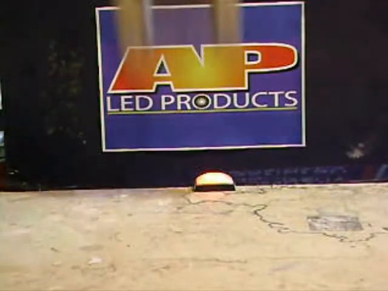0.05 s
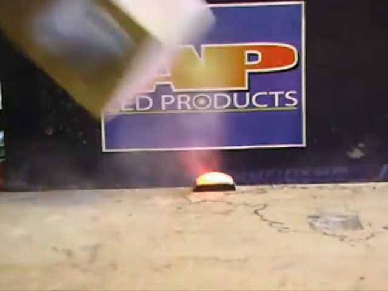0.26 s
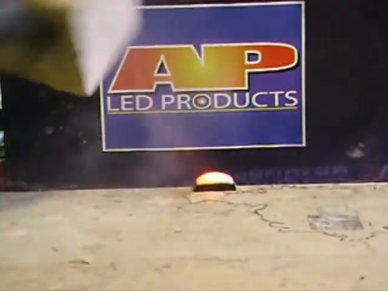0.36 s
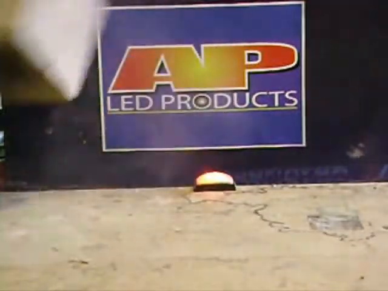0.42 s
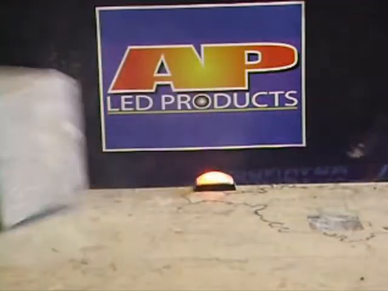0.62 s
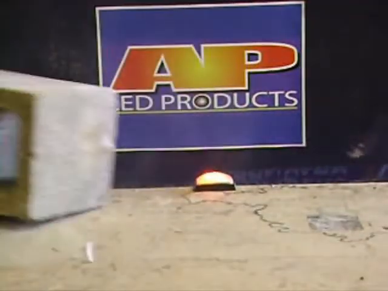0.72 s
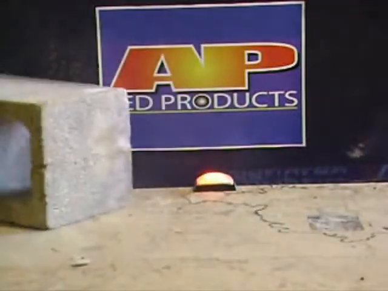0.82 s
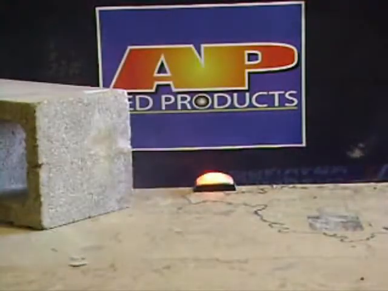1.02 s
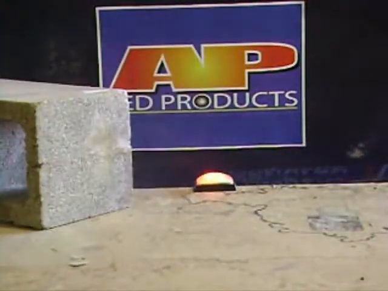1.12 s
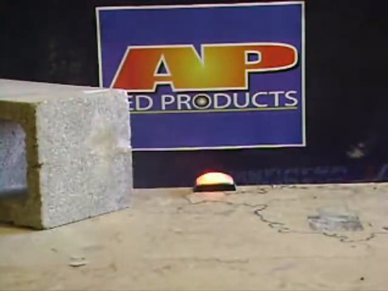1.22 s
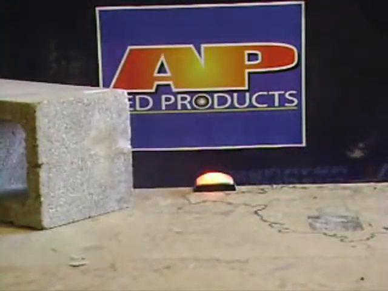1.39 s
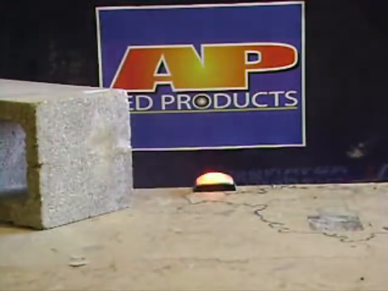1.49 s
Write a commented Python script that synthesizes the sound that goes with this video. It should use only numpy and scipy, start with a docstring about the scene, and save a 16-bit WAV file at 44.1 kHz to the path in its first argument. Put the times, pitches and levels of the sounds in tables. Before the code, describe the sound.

A hollow concrete block crashes onto a small lamp on a concrete floor, tumbles, lands heavily again and rattles to rest as chips scatter. A faint bump follows. Outdoors, nearby walls echo briefly and the microphone distorts heavily.

```python
"""A hollow concrete block crashes onto a small lamp set in a concrete floor, tumbles, lands again and
rattles to rest. Each blow: a snap, a gritty crack, the block's ring, a thud, the floor's knock and boom.
Chips scatter; nearby walls answer. A light tap comes first, a short hollow bump last, over outdoor air.
The small recorder overloads heavily and slowly turns its gain down."""
import sys
import numpy as np
from scipy import signal
from scipy.fft import rfft, irfft
from scipy.io import wavfile
from scipy.ndimage import uniform_filter1d

SR = 44100
rng = np.random.default_rng(int(sys.argv[2]) if len(sys.argv) > 2 else 0)


def int16_out(signal):
    """Quantize to a 16-bit WAV file."""
    q = np.round(np.clip(np.atleast_2d(signal).T, -1, 1) * 32767)
    wavfile.write(sys.argv[1], SR, q.astype(np.int16))


N = 68355
TIME_S = np.arange(N) / SR

# outdoor air spectrum (frequency [Hz], density [dB])
AIR_SPECTRUM = [(25, -13.5), (90, 5), (200, -2.5), (600, -0.5), (1100, -9), (1800, -19), (5200, -21.5)]
# outdoor air envelope (time [s], level [dB])
AIR_ENVELOPE = [(0, -48), (.2, -51), (1.2, -47), (1.55, -56)]

# wall echo spectrum (frequency [Hz], density [dB])
WALL_SPECTRUM = [(40, -10), (130, -6.5), (330, -1), (600, -4.5), (1050, -4), (2100, -2), (3200, -1.5),
                 (5000, -4)]
WALL_DB, WALL_RISE_S, WALL_LOW_T60_S, WALL_HIGH_T60_S, WALL_SPLIT_HZ = -19, 0.022, 0.59, 0.68, 1500

# tap modes (frequency [Hz], relative level [dB], t60 [s])
TAP_MODES = [(340, -3, 0.016), (520, 5.5, 0.013), (1064, -7.5, 0.046), (2470, -18.5, 0.047)]
TAP_S, TAP_DB, TAP_LOW_CUT_HZ = 0.0553, -34.5, 150

# bump tones (frequency [Hz], relative level [dB])
BUMP_TONES = [(305, 3.5), (585, 0.5), (755, 1.5)]
# bump scuff spectrum (frequency [Hz], density [dB])
SCUFF_SPECTRUM = [(100, -46), (200, -24), (250, 8), (400, -2.5), (800, -2), (950, -25), (1600, -27),
                  (5000, -29)]
BUMP_S, BUMP_RISE_S, BUMP_HOLD_S, BUMP_T60_S = 1.442, 0.009, 0.017, 0.078
BUMP_TONE_DB, SCUFF_DB = -38, -32.5

# chip scatter envelope (time [s], level [dB])
CHIP_ENVELOPE = [(.22, -21), (0.548, -20.5), (0.661, -29.5), (.75, -12), (1.05, -24.5), (1.15, -48),
                 (1.25, -55), (1.5, -61.5)]
CHIPS_PER_S, CHIP_T60_CYCLES, CHIP_SPREAD_DB = 500, 19.4, 1.5

# block impacts, relative levels (time [s], snap [dB], crack [dB], thud [dB], boom [dB])
BLOWS = [(.2143, 14, 2.5, 0, -4), (.232, -4, -14, 4, 4.5), (.2487, -10, -1, -4.5, -9),
         (.2772, 6.5, 3.5, -0.5, -7), (0.2984, 6, 1.5, -16, -4.5), (.329, -11, -5.5, -2.5, -23),
         (.347, -6, -3, -27, -24), (.372, -2.5, -6, -12, -20), (.3894, -0.5, 0.5, -21, -19),
         (.4069, -10, -10, -14, -23), (.436, -20, -11.5, -17, -19), (.4508, -8.5, -5.5, -10, -31),
         (.473, -11, -12, -31, -28), (.4957, 8.5, 3, -12.5, -24), (.519, -8.5, -12.5, -8, -14.5),
         (.556, -17, -16.5, -19.5, -22), (0.574, -11, -11.5, -22, -38), (0.6186, -3.5, -11, -25, -19),
         (0.686, -11, -18, 3, 5), (.7037, 2.5, 4.5, 0, 6.5), (.7291, 3.5, -5.5, -2, -28),
         (.7581, 6, 3, -1.5, -12), (.7845, 1.5, 1, -7, -4.5), (.8074, -6, -2.5, -5, -20),
         (.8304, -9, -5, -5.5, -28), (.846, -7.5, -16, -14.5, -34), (.8658, -19, -12, -25, -25),
         (0.894, -21, -19, -17.5, -19), (.9067, -19, -12, -15.5, -21.5), (0.926, -12, -11, -26, -22),
         (.9401, 7.5, 3.5, 1.5, -10), (.965, -20, -11, -2, -11.5), (.988, -20, -7, -18, -12),
         (1.015, -19, -11.5, -30, -20), (1.04, -11.5, -14, -29, -15.5),
         (1.0743, -17.5, -18.5, -27.5, -21.5), (1.112, -30, -28.5, -28.5, -41), (1.148, -33, -30, -32, -32),
         (1.185, -36, -35.5, -35, -43)]
# first-contact snap spectrum (frequency [Hz], density [dB])
SNAP_SPECTRUM = [(300, -11.5), (1000, -4), (2000, 6), (3500, -4.5), (5200, -3.5)]
# crack spectrum (frequency [Hz], density [dB])
CRACK_SPECTRUM = [(100, -21.5), (250, -6.5), (450, 0), (750, 3), (1120, 6), (1450, -4.5), (2200, -9),
                  (3300, -17), (5200, -12)]
# thud spectrum (frequency [Hz], density [dB])
THUD_SPECTRUM = [(120, -7), (230, 2), (400, 3), (700, -1.5), (1400, -27)]
# floor boom spectrum (frequency [Hz], density [dB])
BOOM_SPECTRUM = [(25, -10.5), (55, -3), (125, 1), (180, 0.5), (320, -18), (1000, -42)]
# block modes (frequency [Hz], relative level [dB], t60 [s])
BLOCK_MODES = [(339, -12, 0.12), (481, -9.5, 0.099), (681, -7, 0.17), (840, -5, .12), (1053.7, -3, .13),
               (1160, -6, 0.12), (1870, -8.5, 0.072), (2034, -13.5, 0.11), (2560, -23, .08)]
SNAP_T60_S, CRACK_T60_S, GRIT_SPREAD_DB = 0.022, 0.12, 3
THUD_GAIN_DB, THUD_T60_S = -2, 0.12
KNOCK_GAIN_DB, KNOCK_HZ, KNOCK_T60_S = -0.5, 413.2, 0.049
BOOM_GAIN_DB, BOOM_ATTACK_S, BOOM_T60_S = -4, 0.0042, 0.11
RING_GAIN_DB, RING_SPREAD_DB = -9.5, 1.8

NOISE_TOP_HZ, INPUT_STOP_HZ, OUTPUT_STOP_HZ = 8227, 5927, 16960
GAIN_THRESHOLD_DB, GAIN_FALL_DB_PER_S = -18, 7


def from_db(db):
    """Decibels to gain."""
    return 10 ** (np.asarray(db) / 20)


def unit_rms(x):
    """Scale to rms 1."""
    return x / np.sqrt(np.mean(x ** 2) + 1e-20)


def decay(age_s, t60_s):
    """Exponential fall, 60 dB per t60."""
    return np.exp(-np.log(1000) * age_s / t60_s)


def noise(spectrum):
    """Coloured, band-limited noise, rms 1."""
    hz, db = np.transpose(spectrum)
    bins_hz = np.maximum(np.fft.rfftfreq(N, 1 / SR), 1)
    gain = from_db(np.interp(np.log(bins_hz), np.log(hz), db)) / (1 + (bins_hz / NOISE_TOP_HZ) ** 20)
    return unit_rms(irfft(rfft(rng.standard_normal(N)) * gain, N))


def clicks(times_s, gains):
    """One impulse at each time."""
    return np.bincount((np.asarray(times_s) * SR).astype(int), gains, N)[:N] + 1e-18


def ring(x, hz, t60_s):
    """One mode: a unit impulse starts a decaying unit sine."""
    radius, angle = decay(1 / SR, t60_s), 2 * np.pi * hz / SR
    return signal.lfilter([0, np.sin(angle)], [1, -2 * radius * np.cos(angle), radius ** 2], x)


def bursts(times_s, db, t60_s):
    """Jump-and-decay envelope; overlaps add in power."""
    power = clicks(times_s, from_db(db) ** 2)
    return np.sqrt(signal.lfilter([1], [1, -decay(1 / SR, t60_s) ** 2], power))


def overload(x, ceiling, hardness):
    """Peaks flatten at the ceiling."""
    return x / (1 + np.abs(x / ceiling) ** hardness) ** (1 / hardness)


def air():
    """Faint, low outdoor noise, drifting in level."""
    return noise(AIR_SPECTRUM) * from_db(np.interp(TIME_S, *np.transpose(AIR_ENVELOPE)))


def walls(x):
    """Diffuse echo off nearby walls; treble lasts slightly longer."""
    wash = noise(WALL_SPECTRUM)
    low = signal.sosfilt(signal.butter(1, WALL_SPLIT_HZ, fs=SR, output="sos"), wash)
    tail = low * decay(TIME_S, WALL_LOW_T60_S) + (wash - low) * decay(TIME_S, WALL_HIGH_T60_S)
    tail *= np.minimum(TIME_S / WALL_RISE_S, 1)
    return from_db(WALL_DB) * signal.fftconvolve(x, tail / np.linalg.norm(tail))[:N]


def tap():
    """Light, dull tap: damped modes, bass cut."""
    modes = sum(ring(clicks([TAP_S], [from_db(TAP_DB + db)]), hz, t60_s) for hz, db, t60_s in TAP_MODES)
    return signal.sosfilt(signal.butter(2, TAP_LOW_CUT_HZ, "high", fs=SR, output="sos"), modes)


def bump():
    """Hollow bump: a low scuff and three tones swell, hold and die."""
    age_s = TIME_S - BUMP_S
    rise = np.clip(age_s / BUMP_RISE_S, 0, 1)
    fall = decay(np.maximum(age_s - BUMP_RISE_S - BUMP_HOLD_S, 0), BUMP_T60_S)
    tones = sum(from_db(BUMP_TONE_DB + db) * np.sin(2 * np.pi * (hz * age_s + rng.random()))
                for hz, db in BUMP_TONES)
    return rise * fall * (tones + from_db(SCUFF_DB) * noise(SCUFF_SPECTRUM))


def chips():
    """Fragments tick on the floor at random, each at one of 20 pitches."""
    times_s, db = np.transpose(CHIP_ENVELOPE)
    strengths = from_db(CHIP_SPREAD_DB * np.minimum(rng.exponential(1, N), 2)) * rng.choice([-1, 1], N)
    hits = strengths * (rng.random(N) < CHIPS_PER_S / SR)
    pitches_hz = np.geomspace(650, 4200, 20)
    pitch_index = rng.integers(0, len(pitches_hz), N)
    ticks = sum(ring(hits * (pitch_index == k) + 1e-18, hz, CHIP_T60_CYCLES / hz) / np.sqrt(hz)
                for k, hz in enumerate(pitches_hz))
    return unit_rms(ticks) * from_db(np.interp(TIME_S, times_s, db)) * (TIME_S > times_s[0])


def block_ring(times_s, blow_db):
    """Each blow excites the block's modes, with random spread and sign."""
    modes = np.zeros(N)
    for hz, db, t60_s in BLOCK_MODES:
        gains = from_db(blow_db + db + RING_GAIN_DB + rng.normal(0, RING_SPREAD_DB, len(times_s)))
        signs = rng.choice([-1, 1], len(times_s))
        modes += ring(clicks(times_s, gains * signs), hz, t60_s)
    return modes


def block():
    """Each blow snaps, crushes grit, thuds and rings; the floor knocks and its boom builds up."""
    times_s, snap_db, crack_db, thud_db, boom_db = np.transpose(BLOWS)
    flicker = unit_rms(uniform_filter1d(rng.standard_normal(N), size=90))  # 2 ms grain
    grit = unit_rms(from_db(GRIT_SPREAD_DB * flicker))
    snap = bursts(times_s, snap_db, SNAP_T60_S) * noise(SNAP_SPECTRUM)
    crack = bursts(times_s, crack_db, CRACK_T60_S) * grit * noise(CRACK_SPECTRUM)
    thud = bursts(times_s, thud_db + THUD_GAIN_DB, THUD_T60_S) * noise(THUD_SPECTRUM)
    knock = ring(clicks(times_s, from_db(thud_db + KNOCK_GAIN_DB)), KNOCK_HZ, KNOCK_T60_S)
    boom_drive = bursts(times_s, boom_db + BOOM_GAIN_DB, BOOM_T60_S)
    attack_pole = np.exp(-1 / (BOOM_ATTACK_S * SR))
    boom = signal.lfilter([1 - attack_pole], [1, -attack_pole], boom_drive) * noise(BOOM_SPECTRUM)
    return snap + crack + thud + knock + boom + block_ring(times_s, crack_db)


def scene():
    """Mono mix: direct sound, outdoor air, wall echo."""
    direct = block() + chips() + tap() + bump()
    return (direct + air() + walls(direct))[None]


def record(dry):
    """Overload, low-pass, harder overload, low-pass; gain sinks while loud and stays down."""
    x = overload(dry, ceiling=0.33, hardness=4.63)
    x = signal.sosfilt(signal.cheby2(14, 60, INPUT_STOP_HZ, fs=SR, output="sos"), x)
    x = overload(x, ceiling=0.36, hardness=16)
    loud = uniform_filter1d(x ** 2, size=1000) > from_db(GAIN_THRESHOLD_DB) ** 2  # 23 ms window
    loud_s = np.cumsum(loud, axis=-1) / SR
    x = x * from_db(-GAIN_FALL_DB_PER_S * loud_s)
    return signal.sosfilt(signal.cheby2(12, 70, OUTPUT_STOP_HZ, fs=SR, output="sos"), x)


dry = scene()
out = record(dry)
int16_out(out)
```